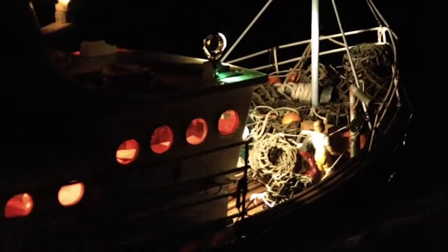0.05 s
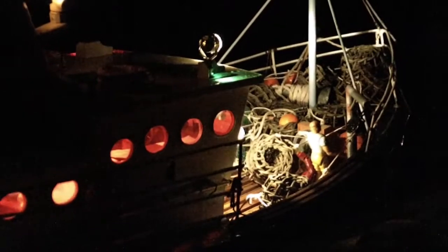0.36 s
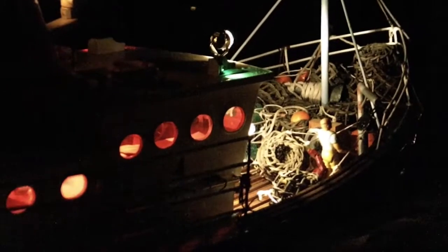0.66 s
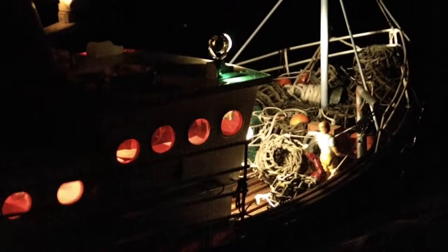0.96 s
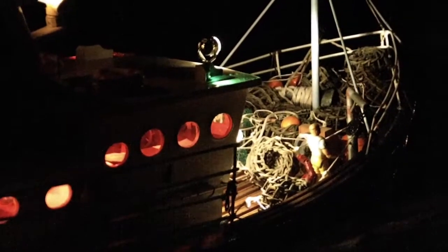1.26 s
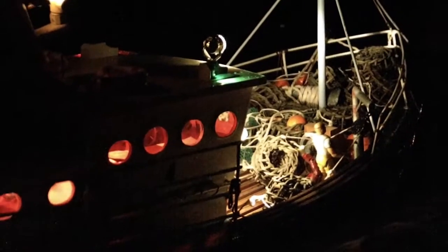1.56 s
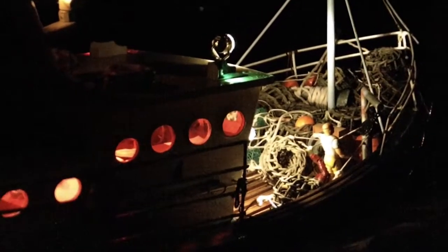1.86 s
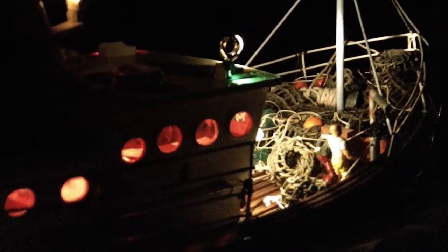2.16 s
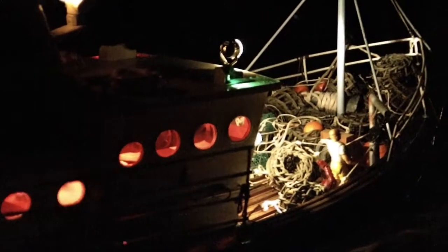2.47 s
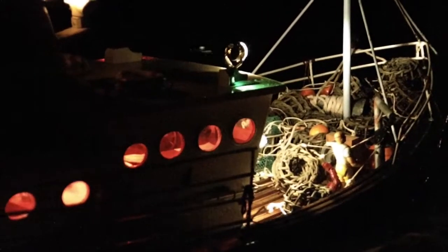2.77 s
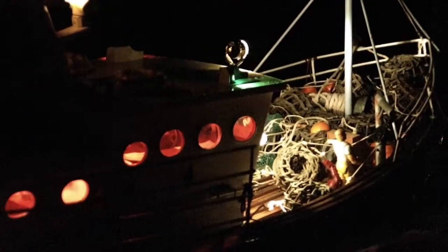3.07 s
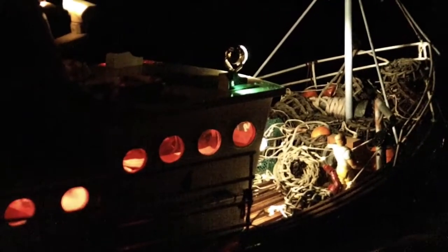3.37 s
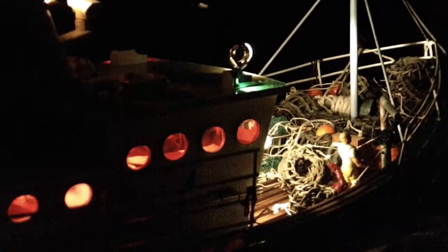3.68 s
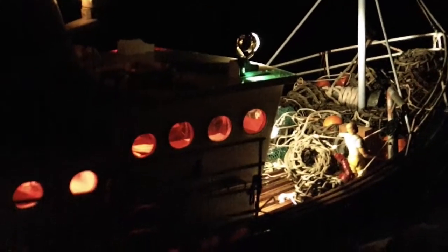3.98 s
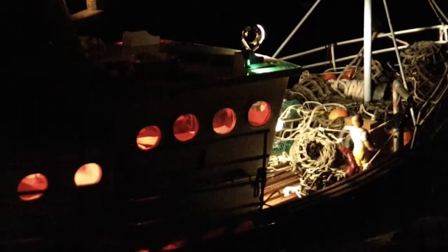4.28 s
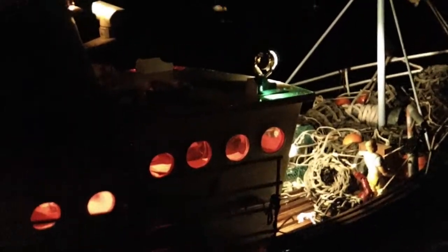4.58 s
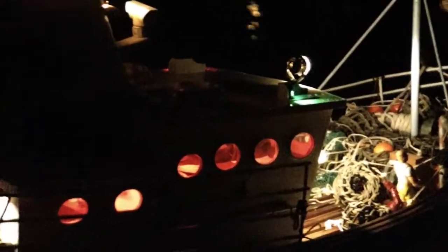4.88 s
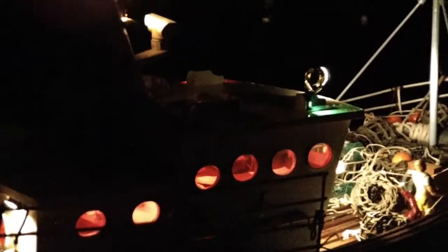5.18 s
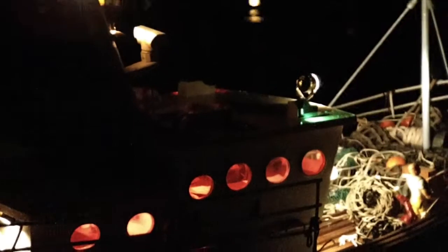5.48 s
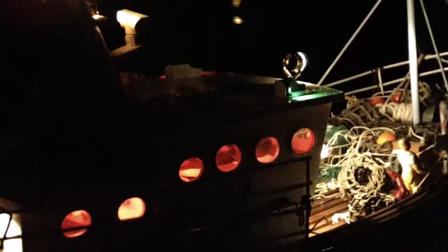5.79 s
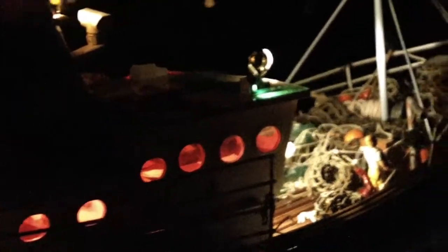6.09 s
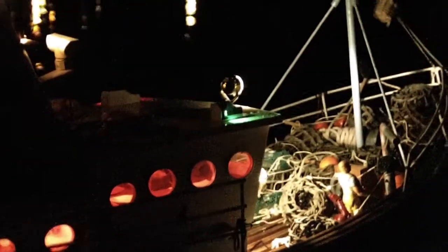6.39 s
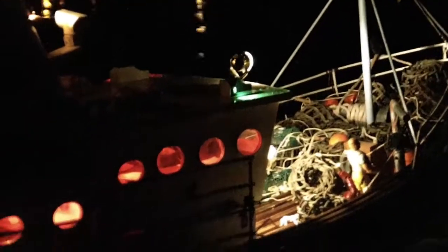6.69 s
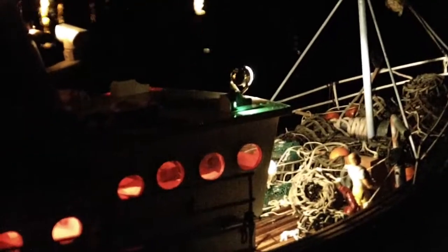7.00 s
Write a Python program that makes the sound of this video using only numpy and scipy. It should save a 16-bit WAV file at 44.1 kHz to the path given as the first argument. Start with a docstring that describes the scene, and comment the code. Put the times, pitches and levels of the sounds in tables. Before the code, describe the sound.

A small model boat is heard up close in quiet surroundings, its motor twitching with rapid, short chirps that ring its housing. A soft hum with a thin whine winds down and stops early while the ticking carries on. Past the middle come a sharp snap, a short rasp of gear teeth and a pulsing whirr. Then the hum kicks back in fast and settles, followed by sharp clicks and knocks, over faint scrapes and hiss.

```python
"""A small motor twitches close by in quick, falling chirps that excite its housing.
Twice it runs on, as a rasp of chattering teeth, then as a throbbing whirr of gearbox resonances.
A catch snaps before each run, and the slack linkage clicks and knocks. A small motor's low hum and
thin whine follow its speed: they wind down, drop out and start again. Beneath lie faint gear murmur,
scrapes, rattles, drip-like blips and hiss."""
import sys
import numpy as np
from scipy import signal
from scipy.fft import rfft, irfft
from scipy.io import wavfile
from scipy.ndimage import uniform_filter1d

SR = 44100
rng = np.random.default_rng(int(sys.argv[2]) if len(sys.argv) > 2 else 0)


def unload_audio(sound):
    """Save the sound as a 16-bit wav file, at the path given as the first command line argument."""
    columns = np.transpose(np.atleast_2d(sound))
    # keep every value between -1 and 1, then stretch to whole-number steps
    steps = np.round(np.clip(columns, -1, 1) * 32767)
    wavfile.write(sys.argv[1], SR, steps.astype(np.int16))


N = 315077
TIME = np.arange(N) / SR
RESTART_S, IDLE_DB = 6.089, -50  # when the humming motor restarts, and the level it settles to

# Spectrum of rasping gear teeth. Each row: frequency in Hz, relative level in dB.
RASP_SPECTRUM = [(100, -33), (250, -25), (400, 1), (600, -12), (1150, -5), (1350, -12), (1600, -1.5),
                 (2250, -2.5), (2800, -17), (4200, -21), (4700, -31), (6800, -24), (7500, -49),
                 (11800, -28), (15000, -45)]
# Spectrum of gritty friction. Each row: frequency in Hz, relative level in dB.
FRICTION_SPECTRUM = [(150, -13), (800, 14), (2000, 1), (4000, -1.5), (7000, 1), (9500, 0.5), (12000, -9.5),
                     (15000, -18)]


def undb(db):
    """Amplitude ratio of a level in decibels."""
    return 10 ** (np.asarray(db) / 20)


def unit(x):
    """Normalisation to rms 1."""
    return x / np.sqrt(np.mean(x ** 2) + 1e-20)


def gate(start, end, fade):
    """Trapezoidal envelope between two times."""
    return np.clip(np.minimum(TIME - start, end - TIME) / fade, 0, 1)


def swell(start, attack, length, release):
    """Envelope with a linear rise, a hold until the length is over, and exponential decay."""
    t = TIME - start
    return np.clip(t / attack, 0, 1) * np.exp(-np.maximum(t - length, 0) / release)


def gaussian(x, width):
    """Bell curve of height 1, centred on zero."""
    return np.exp(-.5 * (x / width) ** 2)


def noise():
    """White Gaussian noise."""
    return rng.standard_normal(N)


def drift(rate):
    """Smooth random modulation of rms 1, with `rate` new values a second."""
    step = int(SR / rate)
    held = np.repeat(rng.standard_normal(N // step + 1), step)
    return unit(uniform_filter1d(held, step)[:N])


def colour(x, points):
    """Minimum-phase filter through (Hz, dB) points that keeps the power of white noise."""
    hz, db = np.transpose(points)
    size = 2048
    bin_hz = np.arange(size // 2 + 1) * SR / size
    gain = unit(undb(np.interp(np.log(bin_hz + 1), np.log(hz), db)))
    cepstrum = irfft(np.log(gain))
    cepstrum[1:size // 2] *= 2
    cepstrum[size // 2 + 1:] = 0
    return signal.fftconvolve(x, irfft(np.exp(rfft(cepstrum))))[:N]


def ring(x, hz, width):
    """Second-order resonator, gain 1 at its centre."""
    return signal.lfilter(*signal.iirpeak(hz, hz / width, fs=SR), x)


def steep_ring(x, hz, width):
    """Two equal resonators in cascade, for steeper skirts."""
    return ring(ring(x, hz, width), hz, width)


def band(hz, width):
    """Narrow-band noise of rms 1."""
    return unit(steep_ring(noise(), hz, width))


def cut(x, hz, kind, order):
    """Maximally flat low-pass or high-pass filter."""
    return signal.sosfilt(signal.butter(order, hz, kind, fs=SR, output="sos"), x)


def phase_of(hz):
    """Phase as the time integral of frequency."""
    return 2 * np.pi * np.cumsum(hz) / SR


def add(out, s, x):
    """Superposition of x on out, from s seconds."""
    i = max(int(s * SR), 0)
    out[i:i + len(x)] += x[:N - i]


def chirp(s, half_length_s, hz, glide_hz_per_s, waver=0.02):
    """Frequency modulation: a wavering linear glide under a Gaussian envelope."""
    t = TIME - s
    bend_hz = glide_hz_per_s * np.clip(t, -2 * half_length_s, 2 * half_length_s)
    phase = phase_of((hz + bend_hz) * (1 + waver * drift(300)))
    return np.sin(phase) * gaussian(t, half_length_s)


def housing(x):
    """Modal response of a shell too small to radiate bass."""
    # Shell modes. Each row: frequency in Hz, bandwidth in Hz, gain in dB.
    modes = [(397.6, 18.8, 8.5), (417, 17, -4), (573, 164, 0.5), (900, 260, -3.5), (1096, 69, -0.5),
             (1510, 95, -11.5), (2110, 96, -12), (2226, 94, -3.5), (3070, 810, -14)]
    return cut(sum(undb(db) * ring(x, hz, width) for hz, width, db in modes), 399, "high", order=5)


def rotation(stop_s=2.125, start_hz=4916, idle_hz=4680, full_hz=10900, settle_s=.4):
    """Rotation slows, stops, restarts fast and settles: whine in Hz, overspeed (0 to 1), amplitude."""
    early, late = np.minimum(TIME, stop_s), np.maximum(TIME - RESTART_S, 0)
    restarted = TIME >= RESTART_S
    overspeed = restarted * np.exp(-(late / settle_s) ** 2)
    slowing_hz = start_hz - 520 * early - 60 * early ** 2
    whine_hz = np.where(restarted, idle_hz + (full_hz - idle_hz) * overspeed, slowing_hz)
    run_down = undb(-51 - early) * np.exp(-(TIME - early) / 0.024)  # sags 1 dB a second, then stops
    kick_db = 2.5 * np.exp(-(late / 0.044) ** 2)
    restart = undb(IDLE_DB + 10 * overspeed + kick_db) * np.minimum(late / .006, 1)
    return whine_hz, overspeed, run_down + restart


def hum(whine_ratio=16.5, reference_hz=1000, edge_db=2):
    """Roughness is fixed per turn, so the spectrum of the rumble scales with motor speed."""
    whine_hz, overspeed, level = rotation()
    # the playing rate moves the cutoff from reference_hz to whine_hz / whine_ratio
    travel = np.cumsum(whine_hz / whine_ratio / reference_hz)
    rough = cut(noise(), reference_hz, "low", order=5)
    broad, edge = (np.interp(travel % N, np.arange(N), v) for v in (rough, ring(rough, 720, 390)))
    # at speed the upper edge leads; when slow the hum booms
    boom = ring(broad, 73, 25) + ring(broad, 133, 56)
    body = broad + undb(edge_db) * overspeed * edge + (1 - overspeed) * boom
    return cut(unit(body) * level, 80.5, "high", order=8)


def whine(tone_db=-24, fast_db=-14, mount_hz=4740, mount_db=-25):
    """A thin motor tone frays into hiss at speed; near resonance the mount sings in sympathy."""
    hz, overspeed, level = rotation()
    phase = phase_of(hz * (1 + .01 * drift(40) + .08 * overspeed * drift(970)))
    tone = drift(330) * np.sin(phase) + drift(260) * np.sin(2 * phase) * gate(0.5, 3.1, 0.33)
    nearness = gaussian(hz - mount_hz, width=230)
    mount = undb(mount_db + 3 * (TIME >= RESTART_S)) * nearness * band(mount_hz, width=220)
    return level * undb(2 * drift(14)) * (undb(tone_db + fast_db * overspeed) * tone + mount)


def murmur(rest_db=-64, idle_gain_db=4.5, hiss_db=-65, whistle_hz=7882, whistle_db=-78.5):
    """Modulated gear noise grows with the motor's vibration, over hiss and an electronic whistle."""
    # Spectra of the idling gears and the hiss. Each row: frequency in Hz, relative level in dB.
    gear_spectrum = [(35, -64), (60, -37), (514, -4.5), (577, 0.5), (916, -13.5), (1030, -0.5),
                     (1230, -10.5), (1330, -4.5), (1540, -7), (1700, -4), (1900, -10), (2060, -6.5),
                     (2650, -18), (7680, -18), (15000, -26)]
    hiss_spectrum = [(30, -8.5), (200, -9), (600, 2.5), (3300, -1.5), (4200, -4), (5700, -1),
                     (6800, -4.5), (11000, -4), (15000, -7)]
    teeth = noise() * undb(3 * drift(300))
    gears = cut(colour(teeth, gear_spectrum), 2780, "low", order=4)
    mutter = unit(gears) + undb(-13) * unit(housing(noise()))
    hiss = undb(hiss_db) * colour(noise(), hiss_spectrum)
    whistle = undb(whistle_db) * np.sqrt(2) * np.sin(2 * np.pi * whistle_hz * TIME)
    flicker_db = 1.7 * drift(35)
    _, _, hum_level = rotation()
    shaking = np.sqrt(hum_level / undb(IDLE_DB))
    return mutter * undb(rest_db + idle_gain_db * shaking + flicker_db) + hiss + whistle


def twitches(hz=406.4, sag_per_s=14, attack_s=0.0026, release_s=0.0044, lead_s_per_octave=0.0015):
    """Transient excitation: a few falling cycles of motor buzz, overtones first, ring the housing."""
    # Motor twitches. Each row: peak time in seconds, level in dB, brightness in dB.
    events = [(0.073, -43.5, -1.5), (.207, -40.5, -13), (.457, -42.5, -.5), (.556, -39, -1),
              (.638, -42.5, -2), (0.757, -39, -4), (.873, -39, -7), (1.19, -39.5, -5.5), (1.322, -42.5, 0),
              (1.44, -38.5, -14), (1.707, -42, -2), (1.825, -41.5, -3.5), (1.907, -42, -1),
              (2.024, -40.5, -11.5), (2.109, -40.5, -1.5), (2.289, -39.5, -5), (2.34, -49, -20),
              (2.409, -54, -7), (2.444, -49.5, -18), (2.472, -39.5, -8.5), (2.541, -45, -20),
              (2.592, -50.5, -15), (2.641, -39.5, -1), (2.774, -40, -5), (2.875, -40.5, -3.5),
              (2.974, -40.5, -4), (3.075, -41.5, -1.5), (3.324, -42.5, -4.5), (3.46, -41, -9.5),
              (3.557, -42, -5.5), (3.909, -41, -7), (4.027, -42, 0), (4.159, -39.5, -2),
              (4.31, -42.5, -0.5), (4.374, -44, 0.5), (4.66, -37.5, -10.5), (4.727, -37, -10),
              (4.829, -39, -10), (4.85, -39.5, -10), (4.959, -39, -2.5), (5.043, -39.5, -6.5),
              (5.143, -40.5, -5), (5.247, -40.5, -2), (5.466, -40.5, -8), (5.611, -38, -11),
              (5.727, -39.5, -8), (5.862, -39.5, -7), (5.925, -40, -5.5), (5.996, -41, -16),
              (6.295, -46.5, -2), (6.532, -35.5, -15), (6.7, -41.5, -7.5), (6.83, -40, -3.5),
              (6.91, -42.5, -4.5), (6.995, -37.5, -8.5), (7.111, -40.5, -6)]
    overtones_db = [0, -8.5, -13, -12, -41]
    buzz, rubs, ticks = np.zeros((3, N))
    t = np.arange(-SR // 50, SR // 25) / SR
    for s, db, bright_db in events:
        pitch_hz = hz * (1 + 0.021 * rng.standard_normal())
        jitter, grit, scratch = rng.standard_normal((3, len(t)))
        uneven = 0.108 * unit(uniform_filter1d(jitter, size=60))  # the teeth pass unevenly
        phase = phase_of(pitch_hz * np.exp(uneven - sag_per_s * np.minimum(t, .001)))
        scatter_db = 2.5 * rng.standard_normal(len(overtones_db))
        for k, partial_db in enumerate([0, *(overtones_db + scatter_db + bright_db)], 1):
            age = t + lead_s_per_octave * np.log2(k)
            envelope = gaussian(age, np.where(age < 0, attack_s, release_s))
            partial = np.sin(k * phase + 2 * np.pi * rng.random())
            add(buzz, s + t[0], undb(db + partial_db) * envelope * partial)
        # the teeth rub just before they turn, and settle afterwards
        rub = undb(bright_db / 2) * gaussian(t + 0.0063, 0.0063) + undb(-13) * gaussian(t - .01, 0.039)
        add(rubs, s + t[0], undb(db) * rub * grit)
        # a dry tick as they first meet
        add(ticks, s - .008, undb(db + bright_db - 12.5) * np.exp((t[0] - t) / 0.0061) * scratch)
    shell = housing(undb(-7) * buzz + cut(rubs, 2410, "low", order=3))
    return cut(buzz, 277, "high", order=7) + shell + ring(ticks, hz=3300, width=1650)


def rattle(per_s=10, tap_db=-41, spread_db=4):
    """Loose parts tap the housing faintly, as a random train of impulses."""
    taps = (rng.random(N) < per_s / SR) * undb(tap_db + spread_db * np.clip(noise(), -2, 1.5))
    return housing(cut(taps, 1500, "low", order=2))


def scrapes(decay_s=0.0066, again_s=0.011):
    """Friction makes tiny gritty noise bursts; each contact recurs once, more lightly."""
    # Rubbing contacts. Each row: start in seconds, relative level in dB.
    contacts = [(0.517, -47), (0.6113, -50.5), (0.98, -47.5), (1.379, -45.5), (1.47, -43.5), (1.589, -50.5),
                (1.641, -53), (2.0148, -44.5), (4.5536, -45), (4.692, -42.5), (4.7212, -43), (4.845, -47.5),
                (5.3532, -47), (5.791, -48), (6.2917, -42.5), (6.317, -46.5), (6.348, -44), (6.55, -44),
                (6.965, -45.5), (7.056, -48.5)]
    rubs, t = np.zeros(N), np.arange(SR // 20) / SR
    touch = np.exp(-t / decay_s) * (1 - np.exp(-t / 0.000081))
    for s, db in contacts:
        add(rubs, s, undb(db - 2) * rng.standard_normal(len(t)) * touch)
        add(rubs, s + again_s, undb(db - 9) * rng.standard_normal(len(t)) * touch)
    return colour(rubs, FRICTION_SPECTRUM)


def blips(half_length_s=.0028, rise_hz_per_s=20000):
    """Brief upward frequency sweeps sound like tiny drips."""
    # Blips. Each row: peak time in seconds, pitch in Hz, peak level in dB.
    sweeps = [(1.662, 2200, -60), (2.195, 1350, -57), (3.74, 1720, -53.5)]
    return sum(undb(db) * chirp(s, half_length_s, hz, rise_hz_per_s) for s, hz, db in sweeps)


def thumps(ring_hz=570, ring_db=-37):
    """Damped bands of noise make low thuds; the restart leaves one mode in free vibration."""
    # Thuds. Each row: start in seconds, level in dB, centre frequency in Hz.
    impacts = [(2.009, -46.5, 200), (5.899, -55, 150), (6.13, -31.5, 464), (6.271, -39, 300)]
    thuds = sum(undb(db) * swell(s, 0.0025, 0.0062, release=0.016) * band(hz, 0.66 * hz)
                for s, db, hz in impacts)
    ringing = np.sin(2 * np.pi * ring_hz * TIME) * swell(RESTART_S, 0.0027, 0.0052, release=0.1)
    return thuds + undb(ring_db) * ringing


def linkage(crack_s=0.0028, shiver_s=0.017, knock_s=0.0093, hard_hz=12000, hard_db=-29):
    """Backlash closes with an impact: a crack that rings the rods and housing, and a damped knock."""
    # Impacts. Each row: start in seconds, crack level in dB, knock level in dB, knock pitch in Hz.
    impacts = [(2.187, -53, -50, 506), (5.293, -42, -43, 573), (5.336, -42.5, -44, 785),
               (6.6073, -25, -32, 735), (6.624, -34.5, -35.5, 670), (6.7512, -41, -24.5, 641),
               (6.7592, -30, -30, 741), (6.7656, -48, -27, 463)]
    # Rod modes. Each row: frequency in Hz, bandwidth in Hz, gain in dB.
    modes = [(1410, 310, 3.5), (1800, 260, 1.5), (2400, 180, -5), (4330, 350, -6), (4820, 280, 0),
             (8300, 760, -8.5), (11440, 400, -11.5)]
    # Spectrum of the direct crack. Each row: frequency in Hz, relative level in dB.
    crack_spectrum = [(200, -15), (600, 4.5), (1200, 2.5), (1900, -3), (2800, -3), (4600, 1), (5800, -14.5),
                      (7500, -11), (11000, -19), (15000, -56)]
    cracks, knocks, t = np.zeros(N), np.zeros(N), np.arange(SR // 10) / SR
    knock_envelope = np.exp(-t / knock_s) * (1 - np.exp(-t / 0.00027))
    for s, crack_db, knock_db, knock_hz in impacts:
        cutoff_hz = hard_hz * 2 ** (min(crack_db - hard_db, 0) / 7)  # an octave duller per 7 dB softer
        burst = rng.standard_normal(len(t)) * (np.exp(-t / crack_s) + 0.17 * np.exp(-t / shiver_s))
        add(cracks, s, undb(crack_db) * cut(burst, cutoff_hz, "low", order=1))
        add(knocks, s, undb(knock_db) * np.sin(2 * np.pi * knock_hz * t) * knock_envelope)
    rods = sum(undb(db) * steep_ring(cracks, hz, 1.3 * width) for hz, width, db in modes)
    direct = undb(-1) * colour(cracks, crack_spectrum)
    return cut(direct + undb(8) * rods + undb(-9) * housing(cracks) + knocks, 290, "high", order=3)


def catch(chatter_db=-17.5, chatter_s=.0014, lead_s=.0003):
    """A hard catch grazes, strikes and chatters; the impulse excites its modes and the housing."""
    # Blows of the catch. Each row: time in seconds, impulse level in dB.
    strikes = [(4.5731, -4), (5.3165, -24), (5.318, -23.5), (5.38, -30)]
    # Its modes. Each row: frequency in Hz, bandwidth in Hz, gain in dB.
    modes = [(1720, 350, 8.5), (2520, 610, -5), (4540, 650, 1), (5630, 480, 2.5), (8440, 500, -9),
             (10400, 350, -4)]
    blows, t = np.zeros(N), np.arange(SR // 100) / SR
    for s, db in strikes:
        add(blows, s, undb(db) * np.ones(1))
        chatter = rng.standard_normal(len(t)) * np.exp(-t / chatter_s)
        add(blows, s - lead_s, undb(db + chatter_db) * chatter)
    ringing = sum(undb(db) * ring(blows, hz, width) for hz, width, db in modes)
    return cut(ringing, 11300, "low", order=2) + undb(5) * housing(blows)


def rasp(start_s=4.64, end_s=4.86, attack_s=0.09, level_db=-43, sag_db_per_s=27):
    """Uneven tooth contact modulates noise; a gear resonance swells, and the run ends in a squeak."""
    teeth = noise() * undb(3.5 * drift(500))
    chatter = unit(colour(teeth, RASP_SPECTRUM)) + undb(-9) * unit(housing(noise()))
    age = np.maximum(TIME - start_s, 0)
    level = undb(level_db - sag_db_per_s * age) * np.minimum(age / attack_s, 1)
    resonance = undb(-45) * band(hz=2100, width=520) * swell(4.67, 0.035, 0.14, 0.0081)
    squeak = undb(-42) * chirp(4.85, 0.0093, hz=1540, glide_hz_per_s=-3000)
    return resonance + chatter * level * gate(start_s, end_s, fade=0.016) + squeak


def take_up(start_s=5.295, length_s=0.096, hz=410):
    """Two jittering harmonics and tooth friction growl as the motor takes up the slack."""
    phase = phase_of(hz * (1 + 0.048 * drift(81)))
    growl = undb(-55) * (np.sin(phase) + np.sin(2 * phase))
    rub = undb(-56) * unit(colour(noise(), RASP_SPECTRUM))
    return (growl + rub) * swell(start_s, .005, length_s, release=0.026)


def whirr(start_s=5.37, slip_s=5.49, end_s=5.875, mesh_hz=512.4, rise_hz_per_s=520, slip_hz=533):
    """Forced vibration: the mesh tone climbs until the gears slip, and the gearbox surges and squeals."""
    # Gearbox modes. Each row: frequency in Hz, bandwidth in Hz, gain in dB.
    modes = [(520, 250, -4), (1053, 110, -1.5), (1218, 95, 0.5), (1445, 92, 3.5), (1548, 55, 6),
             (1788, 41, 5.5), (2064, 115, 3.5), (2250, 95, 2.5), (2430, 85, 3), (3380, 190, -7.5),
             (4230, 160, -15.5), (4700, 200, -14), (5370, 150, -14.5), (6070, 190, -14.5), (7070, 240, -18),
             (8350, 250, -23), (9040, 370, -22), (10750, 340, -26.5)]
    # Surges of the run. Each row: start, attack and length in seconds, level in dB.
    surges = [(5.38, 0.042, 0.09, -44), (5.471, 0.013, 0.065, -43.5), (5.538, 0.014, 0.05, -45),
              (5.604, 0.0051, 0.031, -44), (5.661, 0.0025, 0.02, -41.5), (5.703, 0.0027, 0.025, -41.5),
              (5.745, 0.0035, 0.03, -43.5)]
    # Squeals. Each row: peak time and half length in seconds, pitch in Hz, glide in Hz/s, level in dB.
    glides = [(5.437, 0.031, 2254, 3300, -41.5), (5.464, .025, 1198, 3300.5, -46.5),
              (5.496, 0.011, 2030, -2000, -42.5), (5.517, .008, 1217, -6000, -35.5),
              (5.571, 0.01, 1484, -4000, -37), (5.614, .008, 1416, -6000, -42),
              (5.622, 0.01, 3350, -9000, -52), (5.758, .007, 1930, -6000, -37.5)]
    slip = np.clip((TIME - slip_s) / .049, 0, 1)
    climbing_hz = mesh_hz + rise_hz_per_s * np.maximum(TIME - start_s, 0)
    tooth_hz = (1 - slip) * climbing_hz + slip * slip_hz
    phase = phase_of(tooth_hz * (1 + (0.0087 + .07 * slip) * drift(150)))
    tone = sum(undb(db) * np.sin(k * phase) for k, db in enumerate([9, -9, -12], 1))
    # the tone swells once on the way up, and weakens with the slip
    tone_gain = undb(-59 - 11 * slip) + undb(-38.5) * gaussian(TIME - 5.455, 0.012)
    # each tooth strikes once, and rubs in between
    strikes = np.diff(np.floor(phase / (2 * np.pi)), prepend=0) * undb(2 * drift(500))
    drive = 0.57 * unit(strikes) + noise()
    ringing = sum(undb(db + 2.5 * drift(90)) * steep_ring(drive, hz, 1.22 * width)
                  for hz, width, db in modes)
    gearbox = unit(ringing) + undb(-21.5) * colour(noise(), FRICTION_SPECTRUM)
    surge = np.max([undb(db) * swell(s, attack, length, release=0.012)
                    for s, attack, length, db in surges], axis=0)
    throb = gearbox * np.hypot(undb(-51.5), surge)  # a steady floor between the surges
    squeals = sum(undb(db) * chirp(s, half_s, hz, glide) for s, half_s, hz, glide, db in glides)
    mesh = np.maximum(surge / surge.max(), slip) * tone_gain * tone
    return (throb + squeals + mesh) * gate(start_s, end_s, fade=0.019)


def scene():
    """Superposition of all the sources at one close spot."""
    drive = twitches() + rasp() + take_up() + whirr() + hum() + whine()
    contacts = thumps() + catch() + linkage() + scrapes()
    return (drive + contacts + blips() + rattle() + murmur())[None]


def record(dry, top_hz=15250):
    """Band limiting: an elliptic low-pass cuts the highest treble steeply."""
    return signal.sosfilt(signal.ellip(10, .2, 70, top_hz, fs=SR, output="sos"), dry)


dry = scene()
out = record(dry)
unload_audio(out)
```